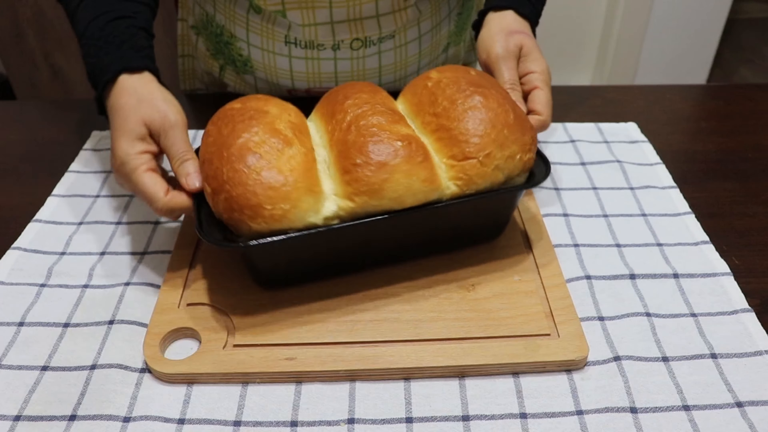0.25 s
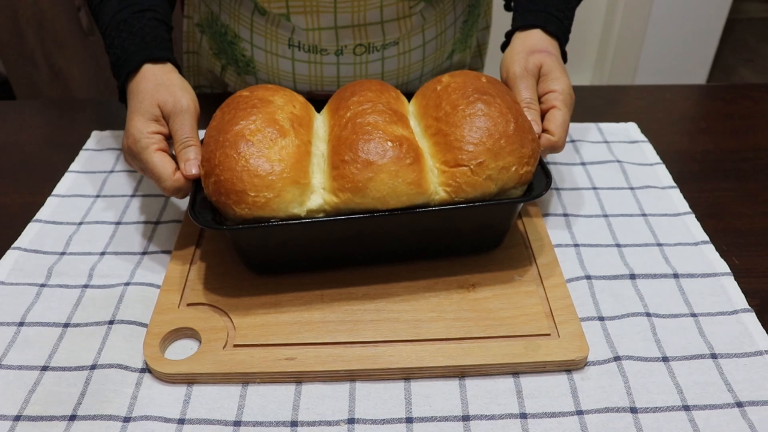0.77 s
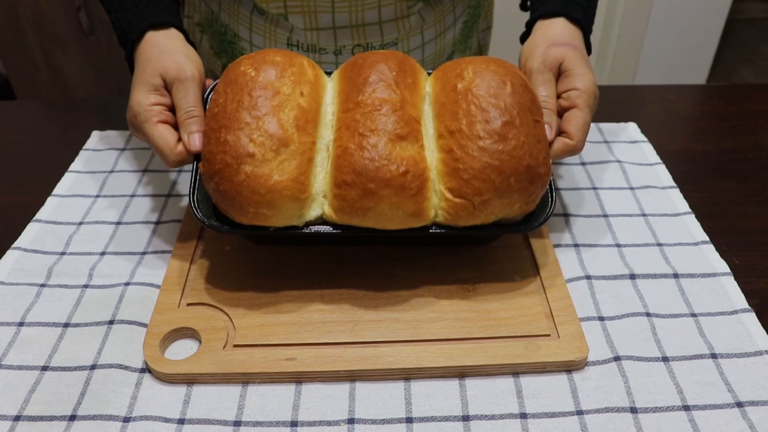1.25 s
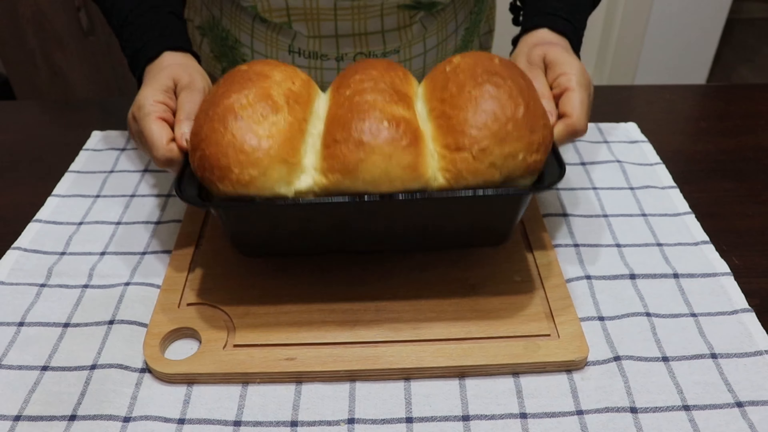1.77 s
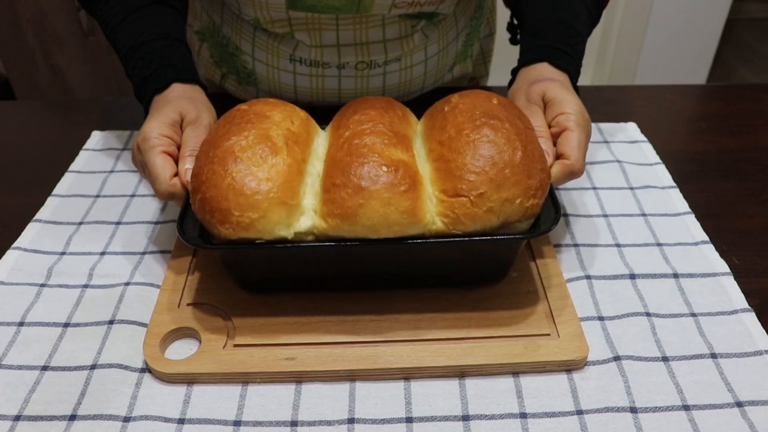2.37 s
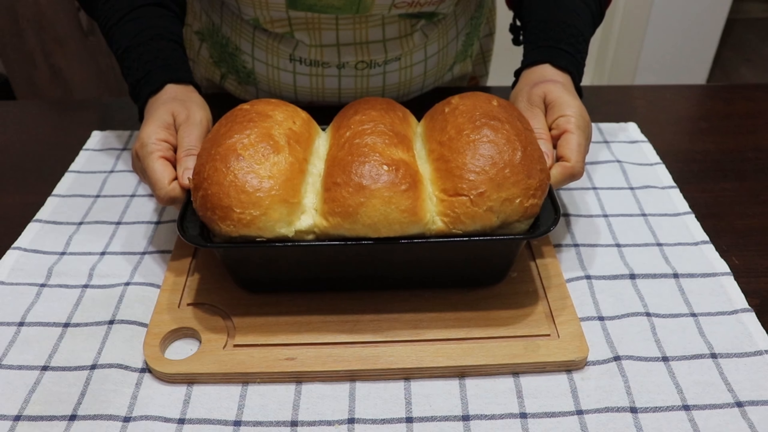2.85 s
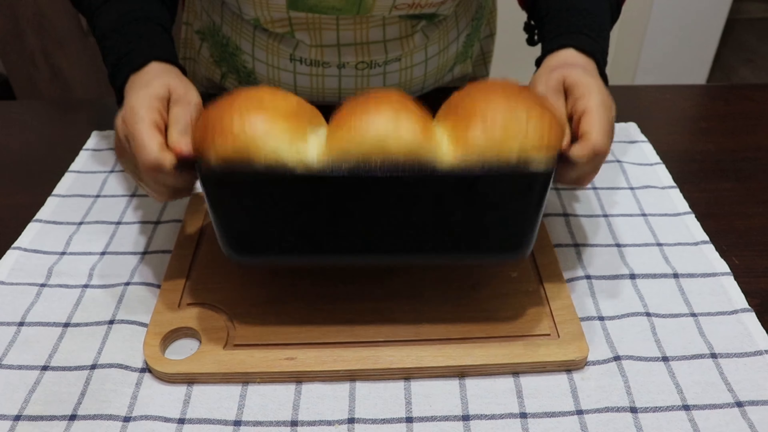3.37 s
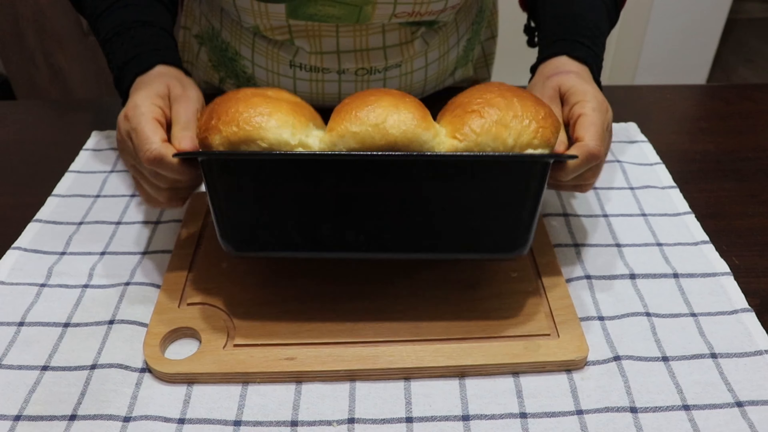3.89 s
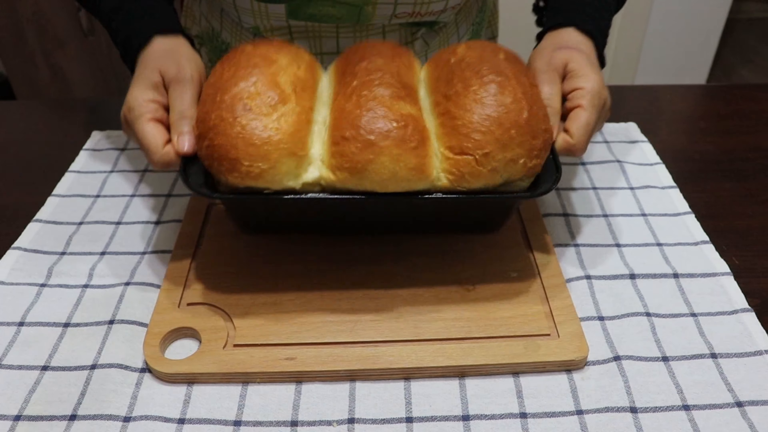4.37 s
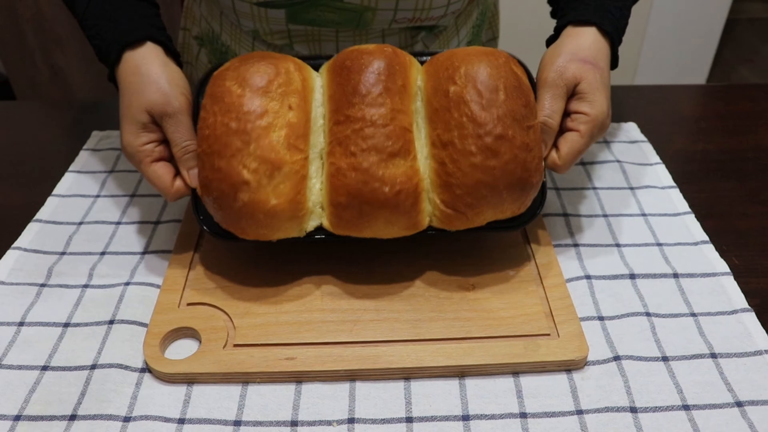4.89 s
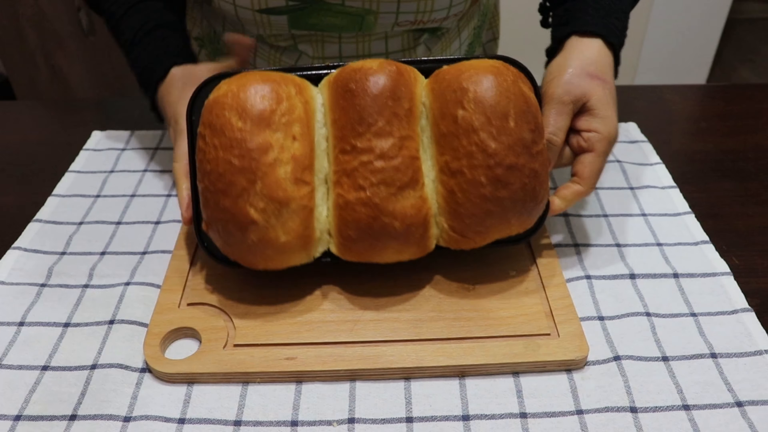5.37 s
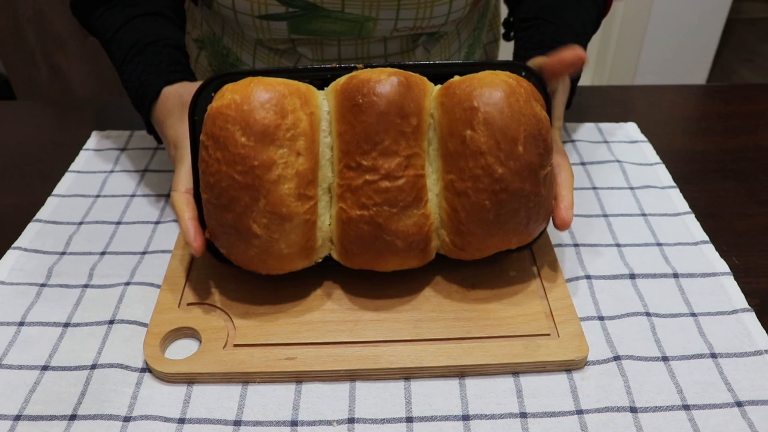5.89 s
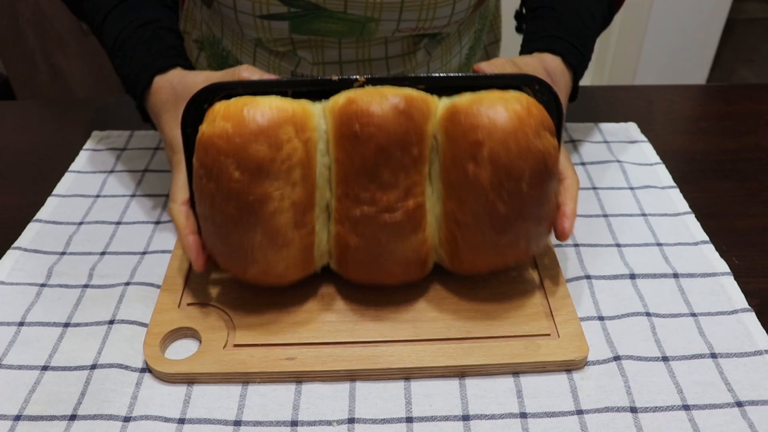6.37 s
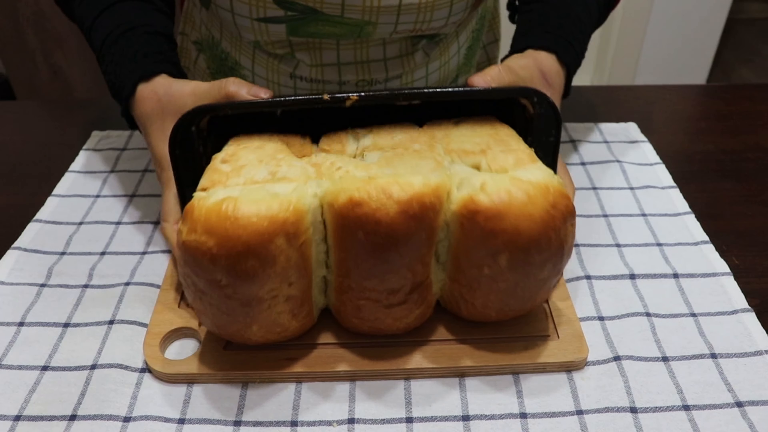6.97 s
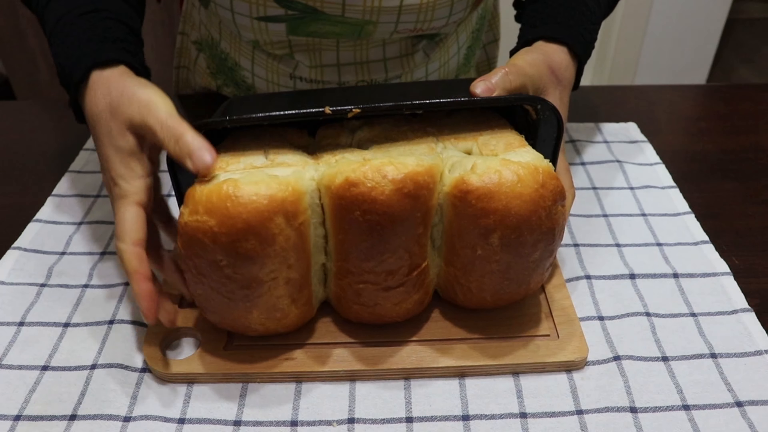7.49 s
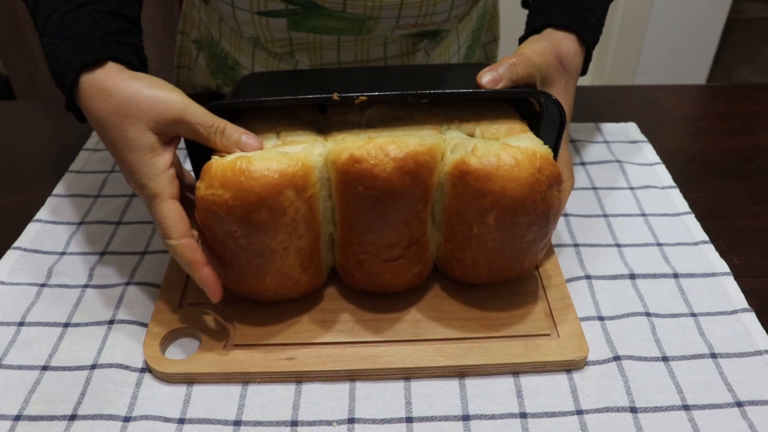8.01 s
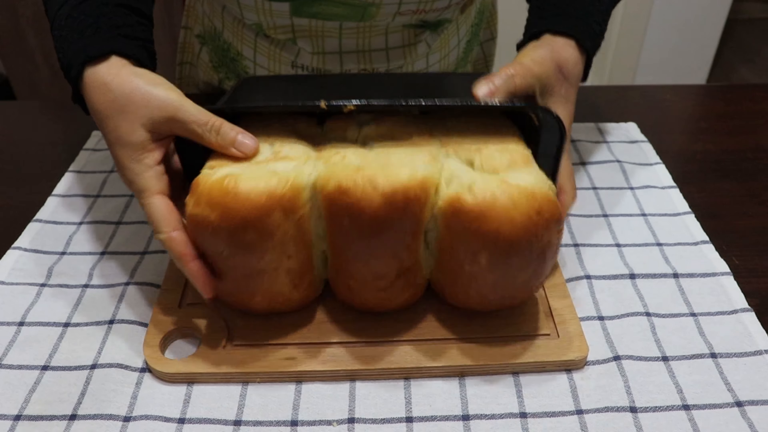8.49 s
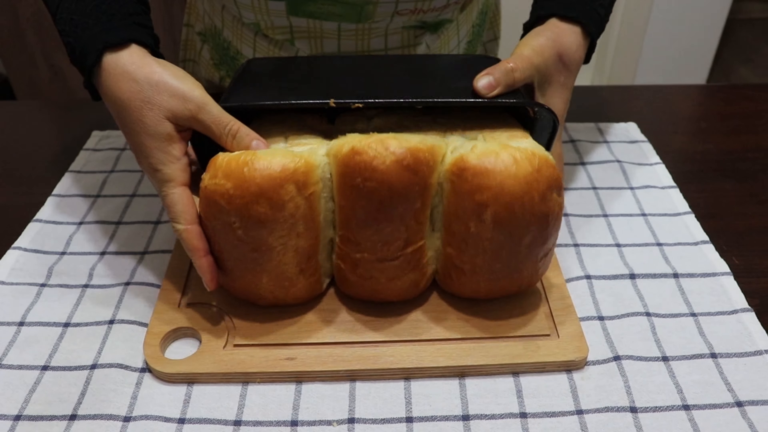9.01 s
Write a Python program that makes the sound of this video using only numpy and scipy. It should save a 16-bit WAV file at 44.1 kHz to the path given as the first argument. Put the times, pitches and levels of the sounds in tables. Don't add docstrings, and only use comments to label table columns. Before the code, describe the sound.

Soft finger rubs on a tin rim over faint house rumble, then four short, heavy, clipped thuds of metal against wood, with short hollow clanks and a quick kitchen echo. Afterwards faint taps, dry scratchy slips of crust against metal, and stronger wooden scraping as the tin is dragged, with little drops. The close microphone ducks after each bang.

```python
import sys
import numpy as np
from scipy import signal
from scipy.fft import rfft, irfft
from scipy.io import wavfile
from scipy.ndimage import uniform_filter1d

SR = 44100
rng = np.random.default_rng(int(sys.argv[2]) if len(sys.argv) > 2 else 0)


def elevation(decibels):
    levels = np.asarray(decibels, float)
    return 10 ** (levels / 20)


def unload_wav(signal):
    wavfile.write(
        sys.argv[1],
        SR,
        np.round(np.clip(np.atleast_2d(signal).T, -1, 1) * 32767).astype(np.int16),
    )


N = 407925

# start_s, table_db, board_db, walls_db, rim_db
FLAT_BLOWS = [
    (2.0468, 4, 7, 4.5, 4.5),
    (2.392, -8.5, 13.5, 9, 10),
    (4.866, 8.5, 10.5, 7.5, 7.5),
]


def flat_blows():
    return knocks(FLAT_BLOWS, rattle_s=0.0015, spread_db=2.0, damping=0.36, crack_over_rim_db=0.0,
                  walls_db_per_octave=-4.5, rim_db_per_octave=-3.5, rim_far_db=-7.0)


# start_s, table_db, board_db, walls_db, rim_db
EDGE_BLOWS = [
    (3.6622, 15, 3.7, 10.9, 2),
]


def edge_blow():
    return knocks(EDGE_BLOWS, rattle_s=0.0011, spread_db=3.5, damping=0.24, crack_over_rim_db=2.5,
                  walls_db_per_octave=14.0, rim_db_per_octave=-18.0, rim_far_db=-0.5)


# start_s, table_db, board_db, walls_db, rim_db
DROPS = [
    (5.04, -22, -18.5, -11.5, -23),
    (7.402, -19, -14.5, -18.5, -37),
    (8.031, -35, -32, -32, -49),
    (8.526, -50, -36, -33, -39),
    (8.7315, -24, -17.5, -16.5, -30),
]


def drops():
    return knocks(DROPS, rattle_s=0.002, spread_db=5.0, damping=0.61, crack_over_rim_db=-6.5,
                  walls_db_per_octave=3.0, rim_db_per_octave=-15.0, rim_far_db=-1.0)


# start_s, table_db, board_db, walls_db, rim_db
TAPS = [(0.036, -37, -34, -45, -44), (1.405, -35, -34, -56, -64), (1.73, -45, -56, -56, -53),
        (2.419, -10, -21, -2, -31), (3.322, -34, -33, -57, -40), (4.322, -59.5, -41, -66, -55),
        (5.329, -29, -44, -49, -49), (5.79, -30.5, -38, -40, -37), (5.854, -41, -46, -49, -43),
        (5.879, -37, -47, -54, -43.5), (6.358, -48, -43, -51.5, -50), (6.755, -61, -52, -51, -42)]


def taps():
    return knocks(TAPS, rattle_s=0.0016, spread_db=3.5, damping=0.7, crack_over_rim_db=-1.0,
                  walls_db_per_octave=-10.0, rim_db_per_octave=4.0, rim_far_db=-5.0)


# freq_hz, level_db, t60_s
TABLE_MODES = [(148, -5, 0.29), (195, -4.5, 0.085), (212, -3.5, 0.17), (295, -1.5, 0.068)]
# freq_hz, level_db, t60_s
BOARD_MODES = [(345, -2, 0.15), (392, 2.5, 0.045)]
# freq_hz, level_db, t60_s
WALL_MODES = [(514, -6, 0.11), (605, -1, 0.043), (708, 5.5, 0.024), (813, 2.5, 0.022), (936, 6, 0.03),
              (1098, -3, 0.044), (1162, -3.5, 0.053), (1312, 4.5, 0.018), (1488, -21, 0.027),
              (1620, -20, 0.01)]
# freq_hz, level_db, t60_s
RIM_MODES = [(2128, 4, 0.024), (2361, 1, 0.03), (2916, -3.5, 0.035), (3277, -8, 0.03), (3733, 2, 0.038),
             (3950, -5, 0.039), (5570, -8.5, 0.058), (6390, -9.5, 0.011)]
# freq_hz, density_db_per_hz
CRACK = [(300, -17.5), (1200, 10.5), (2500, 3.5), (5000, -0.5), (9000, -19), (16000, -28.5)]


def knocks(table, rattle_s, spread_db, damping, crack_over_rim_db,
           walls_db_per_octave, rim_db_per_octave, rim_far_db):
    near, far, age = np.zeros((2, N)), np.zeros(N), np.arange(8192) / SR
    click = age == 0
    shape = elevation(at_hz(CRACK, np.fft.rfftfreq(len(age), 1 / SR)))
    shape /= np.sqrt(np.mean(shape ** 2))
    # modes, tilt_db_per_octave, tilt_pivot_hz, far_db
    parts = ((TABLE_MODES, 0, 1000, 0), (BOARD_MODES, 0, 1000, 0),
             (WALL_MODES, walls_db_per_octave, 1000, 0),
             (RIM_MODES, rim_db_per_octave, 3000, rim_far_db))
    for start_s, *parts_db in table:
        crack_db = parts_db[-1] + crack_over_rim_db
        noise = rng.standard_normal((2, len(age)))
        mid, side = irfft(rfft(noise) * shape) * np.exp(-age / rattle_s)
        ringing = 0
        power = (elevation(crack_db) * shape) ** 2 * rattle_s * SR / 2
        for part_db, (modes, tilt_db, pivot_hz, far_db) in zip(parts_db, parts):
            for k, (hz, db, t60_s) in enumerate(modes):
                luck_db = spread_db * rng.standard_normal()
                mode_db = part_db + db + luck_db + tilt_db * np.log2(hz / pivot_hz)
                mode = elevation(mode_db) * ring(click, hz, damping * t60_s)
                ringing = ringing + (-1) ** k * mode
                power = power + np.abs(rfft(mode) * elevation(far_db)) ** 2
        at = round(start_s * SR)
        lagged = np.array([ringing, np.r_[0, 0, ringing[:-2]]])
        near[:, at:at + len(age)] += lagged + elevation(crack_db) * pair(mid, side, 0.14)
        far[at:at + len(age)] += quickest_pulse(power)
    return near, far


def quickest_pulse(power):
    cepstrum = irfft(np.log(power + 1e-12) / 2)
    cepstrum[1:len(power) - 1] *= 2
    cepstrum[len(power):] = 0
    return irfft(np.exp(rfft(cepstrum)))


def ring(force, hz, t60_s):
    r, w = elevation(-60 / (t60_s * SR)), 2 * np.pi * hz / SR
    return signal.lfilter([0, np.sin(w)], [1, -2 * r * np.cos(w), r * r], force + 1e-18)


# peak_s, board_db, tin_db, rise_s, fall_s
DRAGS = [(7.45, -28, -41, 0.049, 0.033), (7.552, -34, -42, .03, 0.067), (7.64, -55, -40.5, 0.32, .05),
         (7.764, -53, -45.5, .03, .21), (7.874, -23.5, -36, 0.052, 0.1), (7.99, -21.5, -28.5, 0.14, 0.28),
         (8.03, -35, -39, 0.01, 0.043), (8.535, -16.5, -26.5, 0.058, .11), (8.68, -28.5, -52, .11, 0.14),
         (8.756, -25, -30.5, .011, 0.11), (8.89, -36.5, -44, .021, .45), (8.972, -29, -28.5, 0.062, 0.34),
         (9.03, -19.5, -35.5, .08, 0.14), (9.13, -23.5, -32, .08, 0.2), (9.245, -20, -32, 0.3, .11)]
# walls_db, rim_db, grit_db, hiss_db, base_db
DRAG_MIX = [-1.5, -10, -2.5, -17.5, -3.5]


def drags():
    return strokes(DRAGS, DRAG_MIX)


# peak_s, board_db, tin_db, rise_s, fall_s
SLIDES = [(0.23, -50, -45, 0.11, .12), (5.288, -33, -51, 0.06, .03), (5.34, -41.5, -46.5, 0.047, .12),
          (5.74, -52, -54, 0.072, 0.11), (5.8, -37, -45, 0.033, 0.051), (6.368, -48, -44, 0.019, .03),
          (6.652, -43, -30, 0.018, .11), (6.755, -62, -50, 0.018, .05), (6.9, -50, -39.5, 0.024, 0.12),
          (6.988, -42, -32, 0.029, 0.066), (7.134, -43, -38.5, .04, .04), (7.23, -50, -43.5, 0.045, .15),
          (7.35, -49, -50.5, 0.13, 0.13), (7.9, -50, -38.5, 0.14, 0.39), (8.97, -55, -48, .05, 0.24),
          (8.546, -40, -29, 0.081, 0.054)]
# walls_db, rim_db, grit_db, hiss_db, base_db
SLIDE_MIX = [-4.5, -9.5, 0, -2, -40]


def slides():
    return strokes(SLIDES, SLIDE_MIX)


# peak_s, board_db, tin_db, rise_s, fall_s
GRIPS = [(0.045, -48, -47, 0.0062, 0.099), (0.234, -38, -41.5, 0.17, 0.16),
         (0.355, -40.5, -48.5, .03, 0.15), (1.08, -55, -50.5, .08, 0.32), (1.184, -36.5, -48.5, 0.17, 0.2),
         (1.3, -48, -69.5, 0.034, 0.044), (1.4, -43, -56, 0.04, 0.027), (3.33, -25, -46, 0.0074, 0.019),
         (3.37, -33.5, -43, 0.06, 0.013), (3.444, -40, -69, 0.1, .12), (5.572, -54, -49, 0.11, .07),
         (5.83, -57, -55, .021, 0.17), (6.004, -60, -54, .06, 0.39), (6.276, -55, -52, .08, 0.27)]
# walls_db, rim_db, grit_db, hiss_db, base_db
GRIP_MIX = [-3, -4.5, -6, -7.5, -24.5]


def grips():
    return strokes(GRIPS, GRIP_MIX)


def strokes(table, mix_db):
    power, t = np.zeros((6, N)), np.arange(N) / SR
    for peak_s, board_db, tin_db, rise_s, fall_s in table:
        first = max(int((peak_s - 3 * rise_s) * SR), 0)
        near = slice(first, int((peak_s + 3 * fall_s) * SR))
        away = np.maximum((peak_s - t[near]) / rise_s, (t[near] - peak_s) / fall_s)
        shape = elevation(-20 * away)
        layers_db = np.r_[board_db, np.add(tin_db, mix_db)]
        power[:, near] += (shape * elevation(layers_db[:, None])) ** 2
    return power


# freq_hz, level_db, t60_s
DRAGGED_MODES = [(133.3, -7.5, 0.17), (208.2, -2.5, 0.085), (286.5, -1, 0.066), (343.4, -5, 0.12),
                 (399, -1, .12)]
# freq_hz, width_hz, level_db
BASE_MODES = [(1185, 53, -2), (1432, 21, -4.5), (2158, 30, -3), (2327, 52, -4), (3330, 37, -10),
              (3600, 87, -14)]
# freq_hz, density_db_per_hz
GRIT = [(900, -13.5), (1700, -1), (2500, -0.5), (4500, -5.5), (7000, -25.5)]
# freq_hz, density_db_per_hz
CRUST = [(1760, -44), (3000, -1), (3830, -2.5), (4750, -4), (7050, 1.5), (8340, 1), (15800, -19)]
RUB_ALIKE = [0.98, 0.92, 0.49, 0.5, 0.086, .45]


def rubs(slips_per_s, size_db, damping, judder_db, judder_s):
    size = elevation(size_db * np.minimum(rng.exponential(1, (2, N)), 4))
    slips = (rng.random((2, N)) < slips_per_s / SR) * size * rng.choice([-1, 1], (2, N))
    width = int(judder_s * SR)
    judder = rms_one(uniform_filter1d(uniform_filter1d(rng.standard_normal(N), width), width))
    slips = slips * elevation(judder_db * judder)

    def shaken(modes):
        return rms_one(sum((-1) ** k * elevation(db) * ring(slips, hz, damping * t60_s)
                           for k, (hz, db, t60_s) in enumerate(modes)))

    rim = [(hz, db + 4 * np.log2(hz / 3000), t60_s) for hz, db, t60_s in RIM_MODES]
    base = [(hz, db + 10 * np.log10(width_hz), 2.1 / width_hz) for hz, width_hz, db in BASE_MODES]
    layers = (shaken(DRAGGED_MODES), shaken(WALL_MODES), shaken(rim),
              colour(slips, GRIT), colour(slips, CRUST), shaken(base))
    levels = np.sqrt(drags() + grips() + slides())
    return sum(level * pair(mid, side, alike)
               for level, (mid, side), alike in zip(levels, layers, RUB_ALIKE))


def rms_one(x):
    return x / np.sqrt(np.mean(x ** 2) + 1e-20)


def at_hz(points, hz):
    points_hz, values = np.transpose(points)
    return np.interp(np.log(np.maximum(hz, 1)), np.log(points_hz), values)


def colour(x, spectrum):
    return rms_one(irfft(rfft(x) * elevation(at_hz(spectrum, np.fft.rfftfreq(N, 1 / SR))), N))


def pair(mid, side, alike):
    alike = np.clip(alike, -1, 1)
    return np.sqrt(1 + alike) * mid + np.sqrt(1 - alike) * side * np.array([[1], [-1]])


# freq_hz, t60_s
ROOM_T60 = [(90, 0.94), (130, 0.67), (220, 0.9), (400, 0.57), (700, 0.52), (1400, 0.54), (3000, 0.39),
            (8000, 0.39)]
# freq_hz, level_db
ROOM_COLOUR = [(60, -5.5), (130, -4.5), (500, -1.5), (1500, 2), (4000, -2), (12000, -10)]
# freq_hz, alike [-1..1]
ROOM_ALIKE = [(60, 0.35), (150, 1), (380, 0.87), (950, 0.63), (2380, 0), (5980, 0.16), (15000, 0.21)]


def kitchen(x, build_s):
    age = np.arange(SR * 3 // 2) / SR
    tail, edges_hz = 0, 40 * 2 ** np.arange(0, 9, .5)
    white = rng.standard_normal((2, 2, len(age)))
    for k, (low_hz, high_hz) in enumerate(zip(edges_hz, edges_hz[1:])):
        band = signal.butter(2, [low_hz, high_hz], "band", fs=SR, output="sos")
        mid, side = signal.sosfilt(band, white[k % 2])
        hz = np.sqrt(low_hz * high_hz)
        decay = elevation(at_hz(ROOM_COLOUR, hz) - 60 * age / at_hz(ROOM_T60, hz))
        tail = tail + decay * pair(mid, side, at_hz(ROOM_ALIKE, hz))
    return signal.fftconvolve(x[None], tail * (1 - np.exp(-age / build_s)), axes=1)[:, :N]


# freq_hz, level_db
FLOOR = [(12, -78), (20, -12.5), (70, -10.5), (190, -9), (431, -15), (1950, -21), (6290, -27), (15800, -35)]
# freq_hz, alike [-1..1]
FLOOR_ALIKE = [(60, 1), (240, 0.26), (950, 0.07), (3770, 0.066), (15000, 0.015)]


def still_air():
    hz = np.fft.rfftfreq(N, 1 / SR)
    mid, side = rfft(rng.standard_normal((2, N))) * elevation(at_hz(FLOOR, hz))
    return elevation(-49.5) * rms_one(irfft(pair(mid, side, at_hz(FLOOR_ALIKE, hz)), N))


def scene():
    flat, flat_far = flat_blows()
    edge, edge_far = edge_blow()
    tapped, tapped_far = taps()
    dropped, dropped_far = drops()
    rubbed = rubs(slips_per_s=4000, size_db=2.0, damping=0.93, judder_db=1.5, judder_s=.015)
    room_feed = elevation(-34.0) * (flat_far + edge_far) + elevation(-34.5) * tapped_far
    room_feed += elevation(-37.0) * dropped_far + elevation(-45) * rubbed.mean(0)
    room = kitchen(room_feed, build_s=0.0066)
    direct = flat + edge + tapped + dropped + elevation(-5.0) * rubbed
    bass_cut = signal.butter(6, 126, "high", fs=SR, output="sos")
    return signal.sosfilt(bass_cut, direct + room) + still_air()


def band_limit(x):
    return signal.sosfilt(signal.butter(12, 15950, fs=SR, output="sos"), x)


def record(dry):
    t = np.arange(N) / SR
    sense, grip = np.exp(-1 / (0.014 * SR)), np.exp(-1 / (0.0076 * SR))
    late = round(0.0052 * SR)
    power = signal.lfilter([1 - sense], [1, -sense], np.mean(dry ** 2, 0))
    level_db = 10 * np.log10(power + 1e-12)
    ramp_db = 110 * t
    over_db = np.maximum(level_db + 17.0, 0)
    over_db = np.maximum.accumulate(over_db + ramp_db) - ramp_db
    over_db = signal.lfilter([1 - grip], [1, -grip], over_db)
    over_db = np.roll(over_db, late) * (np.arange(N) > late)
    clipped = np.clip(dry * elevation(-over_db), -1, 1)
    top_cut = signal.butter(2, 14800, fs=SR, output="sos")
    held = 1.001 * signal.sosfilt(top_cut, clipped) + elevation(-77.5) * rng.standard_normal(dry.shape)
    gap_db = np.interp(t, [0, .003, .012, .031, .034], [8, 0, -25, -38, 0])
    return band_limit(held * elevation(gap_db))


dry = scene()
out = record(dry)
unload_wav(out)
```